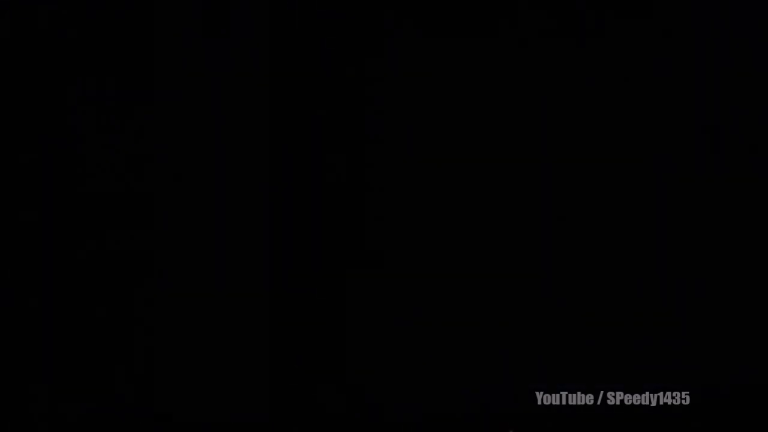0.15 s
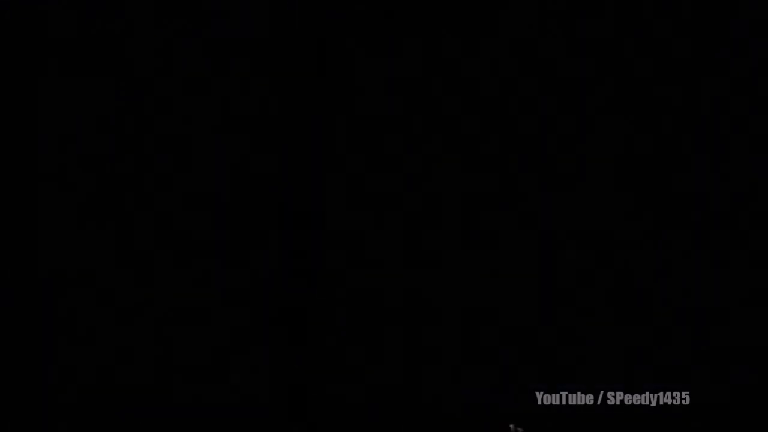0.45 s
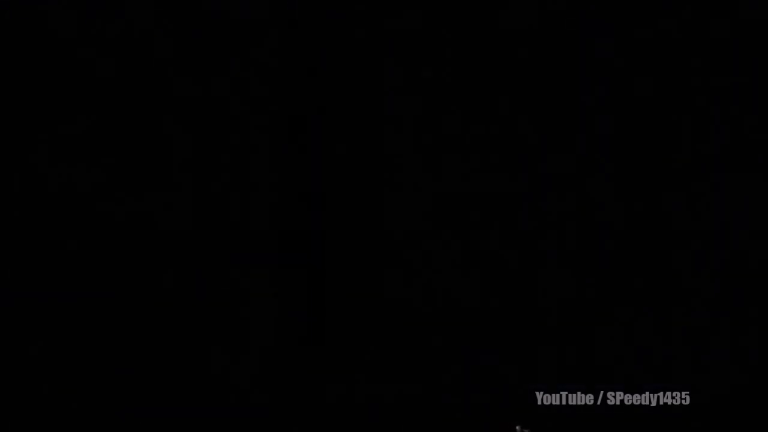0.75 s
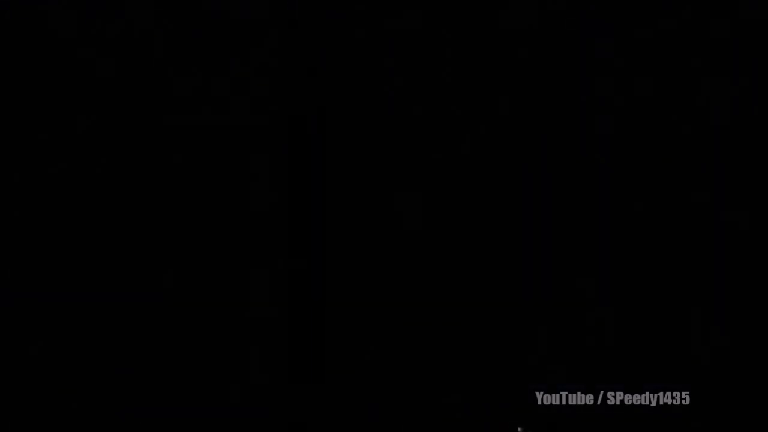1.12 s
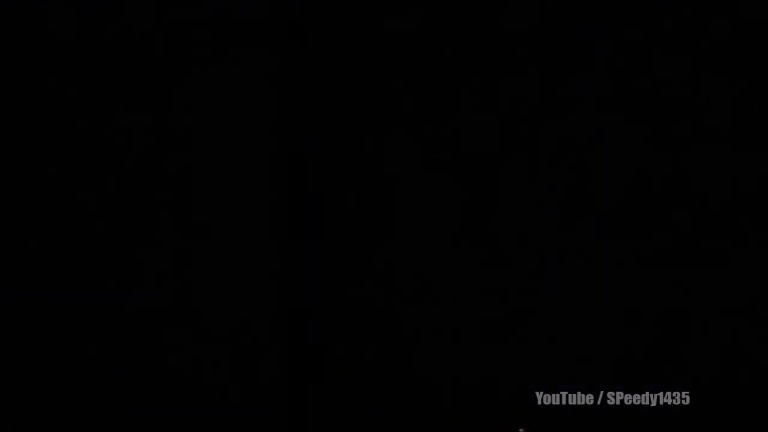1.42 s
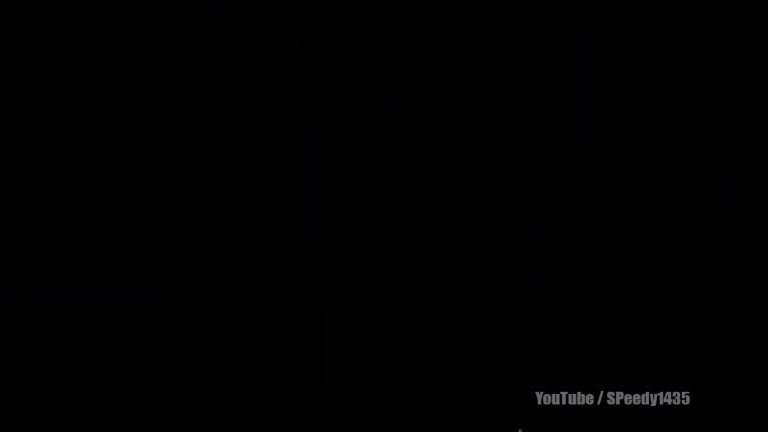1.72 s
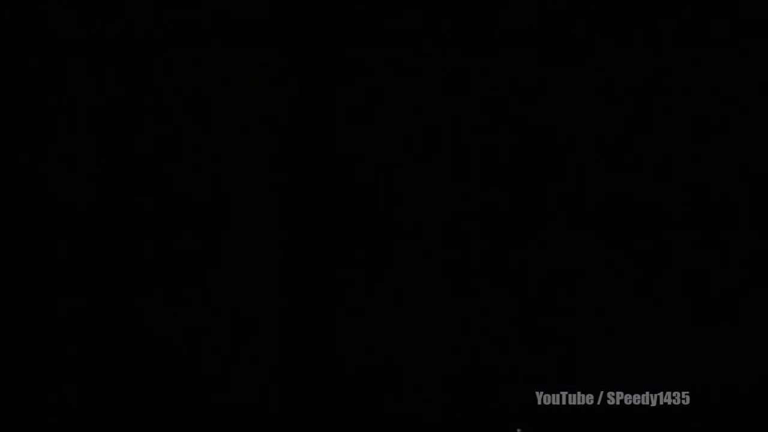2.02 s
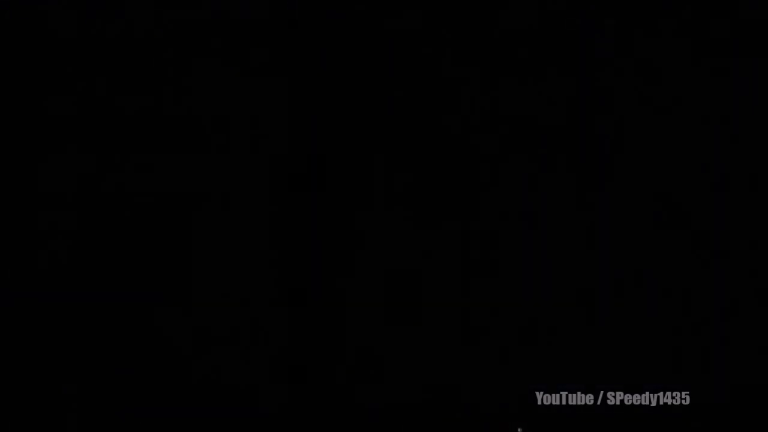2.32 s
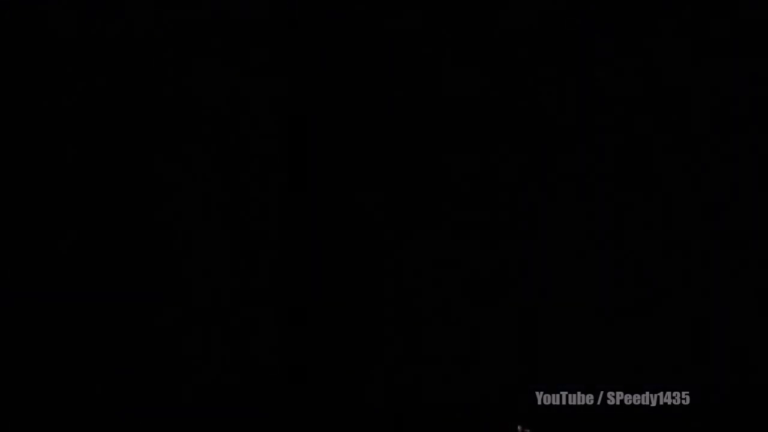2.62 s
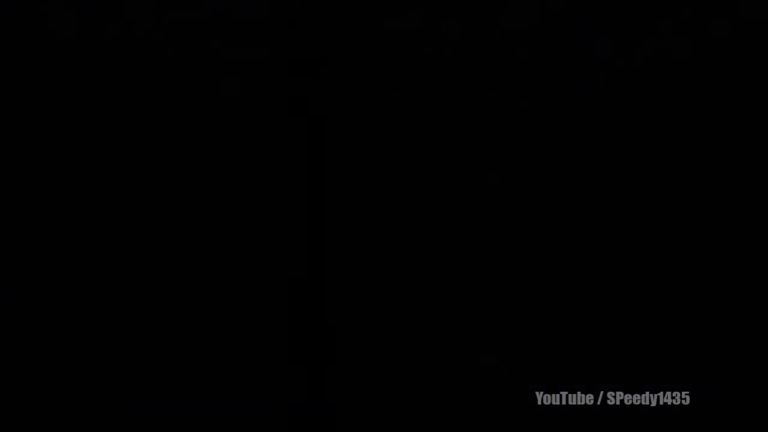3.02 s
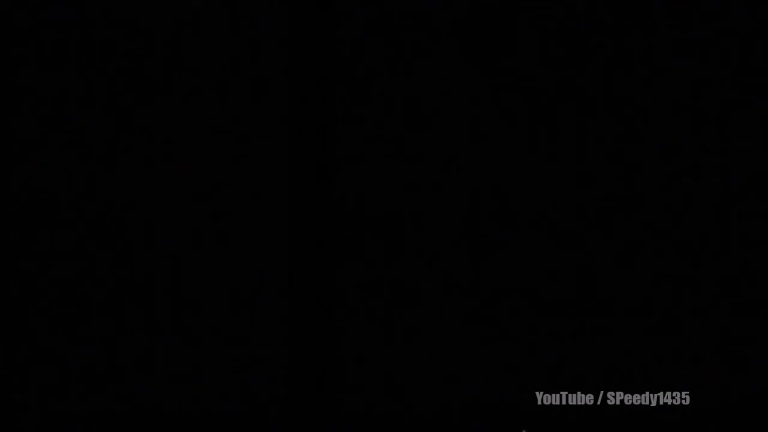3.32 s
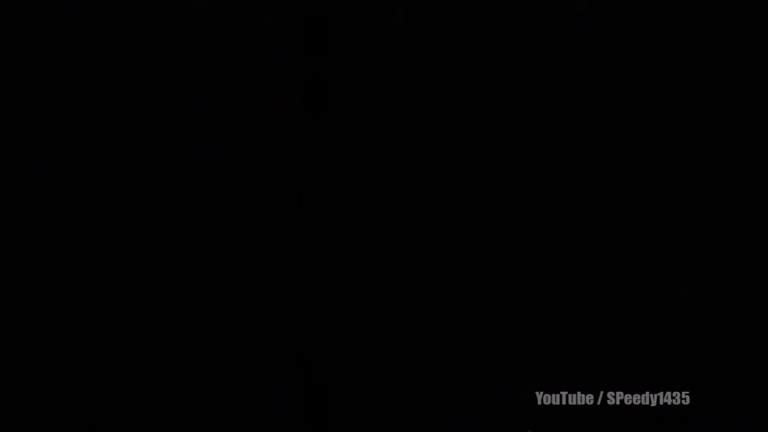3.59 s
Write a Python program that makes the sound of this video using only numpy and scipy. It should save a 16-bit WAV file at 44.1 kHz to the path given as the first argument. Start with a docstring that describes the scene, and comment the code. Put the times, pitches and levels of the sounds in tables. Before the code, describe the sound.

Distant thunder begins as a faint low rumble over soft, steady rain hiss, swells from 0.4 to 0.7 s, and rolls heavily in uneven booming surges until about 1.9 s. It weakens through 2.4 s, stirs again softly near 3.0 and 3.4 s, then fades. Dark, hollow resonance, no sharp crack. Very faint high electronic whine; treble blinks out briefly near 0.9, 1.4, 1.7, 1.8 and 3.7 s.

```python
"""Distant thunder rolls and booms over an evenly hissing far rain; thin tones whine, the treble briefly drops out.
Thunder: random pressure pulses from a long lightning channel, in four registers, ringing in the shelter.
Boom: two low sines, wavering in pitch and level. Rain: patchy noise with dense drops.
Whine: four sines at fixed pitch from the electronics. Dropouts: short dips of the upper spectrum."""
import sys
import numpy as np
from scipy import signal
from scipy.fft import rfft, irfft, next_fast_len
from scipy.io import wavfile
from scipy.ndimage import uniform_filter1d, map_coordinates

SR = 44100
rng = np.random.default_rng(int(sys.argv[2]) if len(sys.argv) > 2 else 0)


def makeup_ratio(level_db):
    """Linear amplitude ratio for a level in decibels (20 dB per factor of ten)."""
    decades = np.asarray(level_db, float) / 20
    return 10 ** decades


def dump(signal):
    """Clip the signal to [-1, 1] and save it as 16-bit WAV at the path in sys.argv[1]."""
    limited = np.clip(np.atleast_2d(signal).T, -1, 1)
    pcm = np.round(limited * 32767).astype(np.int16)
    wavfile.write(sys.argv[1], SR, pcm)


N = 165375


def unit(x):
    """Scales x to rms 1."""
    return x / np.sqrt(np.mean(x ** 2) + 1e-20)


def along(points, hz):
    """Gain from (f/Hz, level/dB) points, interpolated over log frequency."""
    f, level_db = np.transpose(points)
    return makeup_ratio(np.interp(np.log(hz + 1), np.log(f + 1), level_db))


def wobble(knots_per_s):
    """Smooth random curve: a spline through normal random knots."""
    knots = rng.standard_normal(400)
    return map_coordinates(knots, [np.arange(N) * knots_per_s / SR])


def filtered(x, response):
    """Filters x by a response of frequency, zero-padded."""
    m = next_fast_len(N + SR // 2)
    spectrum = rfft(x, m) * response(np.fft.rfftfreq(m, 1 / SR))
    return irfft(spectrum, m)[:N]


def impulses(per_s, spread_db):
    """Random arrivals of either sign; sizes in dB are exponentially distributed with mean spread_db."""
    u = rng.random((int(per_s * N / SR), 3))
    sample = (u[:, 0] * N).astype(int)
    sign = np.sign(u[:, 1] - .5)
    size = makeup_ratio(-spread_db * np.log(1 - u[:, 2]))
    return np.bincount(sample, sign * size, N)


def whine():
    """Thin tones of the electronics: sines at fixed pitch, slightly wavering in level."""
    # electronic tones: f/Hz, mean level/dB rms
    tones = [(7852, -78), (7882, -76), (11793, -79), (11823, -87)]
    t = np.arange(N) / SR
    total = 0
    for hz, db in tones:
        level = np.sqrt(2) * makeup_ratio(db + .7 * wobble(3))
        total = total + level * np.sin(2 * np.pi * hz * t)
    return total


def rain():
    """Far rain: noise, patchy over time and frequency, plus dense drops, in one spectral shape."""
    # spectral shape of the rain: f/Hz, relative level/dB
    rain_shape = [(150, 6), (700, -0.5), (1500, -1.3), (2600, -2.3), (4000, -8), (6000, -11), (8500, -16.5),
                  (11000, -21), (13000, -24.5), (15100, -31)]
    rain_db, patchy_db, drops_db = -46, 0.8, -8.5  # total rms; rms of the patches; drops over hiss
    drops_per_s = 3000
    z = signal.stft(rng.standard_normal(N + 512), nperseg=512)[2]
    patches = uniform_filter1d(rng.standard_normal(z.shape), 6, 0)
    patches = uniform_filter1d(patches, 10, 1)
    hiss = signal.istft(z * makeup_ratio(patchy_db * unit(patches)), nperseg=512)[1][:N]
    drops = unit(impulses(drops_per_s, 1.81))
    mix = unit(hiss) + makeup_ratio(drops_db) * drops
    return makeup_ratio(rain_db) * unit(filtered(mix, lambda hz: along(rain_shape, hz)))


def shelter(hz):
    """Response of the shelter: open air plus hollows that ring as second-order resonances."""
    # hollows: f/Hz, width/Hz, peak of each alone over open air/dB
    hollows = [(87, 7, 5), (103, 8, 3), (120, 8, 3), (172, 12, 6), (204, 10, 5), (235, 12, 2), (266, 14, 3),
               (337, 11, 6), (366, 12, 7), (424, 14, 4), (460, 12, 4), (508, 18, 3), (600, 22, 3),
               (778, 16, 3), (955, 60, 2)]
    total = 1
    for centre, width, db in hollows:
        damping = 1j * hz * width
        total = total + (makeup_ratio(db) - 1) * damping / (centre * centre - hz * hz + damping)
    return total


def boom():
    """The two lowest hollows boom almost as tones: sines wavering randomly in pitch and level."""
    # course of the boom: t/s, level of lower/dB rms, level of upper/dB rms
    boom_course = [(0.0, -43, -40), (0.11, -35, -49), (0.19, -56, -58), (0.36, -37, -42.5), (0.5, -50, -36),
                   (0.55, -49, -47), (0.7, -38, -33), (1.02, -39, -32), (1.14, -59, -41.5), (1.2, -39, -39),
                   (1.39, -38, -45), (1.73, -37, -27.5), (1.98, -29, -27.5), (2.06, -29, -40),
                   (2.15, -31, -36), (2.21, -54, -50), (2.27, -32, -33), (2.36, -28.5, -34.5),
                   (2.45, -40, -41), (2.84, -43, -45), (2.91, -37, -52), (2.98, -32, -40),
                   (3.31, -46.5, -52), (3.75, -40, -52)]
    # mean pitches of the two hollows: lower f/Hz, upper f/Hz
    boom_hz = (56, 68.25)
    waver_hz, waver_db = 2.5, 0.5
    s, *levels = np.transpose(boom_course)
    t = np.arange(N) / SR
    total = 0
    for hz, db in zip(boom_hz, levels):
        level = np.sqrt(2) * makeup_ratio(np.interp(t, s, db) + waver_db * wobble(18))
        phase = 2 * np.pi * np.cumsum(hz + waver_hz * wobble(7.4)) / SR
        total = total + level * np.sin(phase)
    return total


def thunder():
    """Pulses from near and far parts of the channel pile up in each register, which swells and fades on its own."""
    # the roll: t/s, deep level/dB, body level/dB, growl level/dB, upper edge level/dB
    roll = [(0.0, -56, -55, -46, -43), (0.02, -43.5, -42, -45.5, -52), (0.27, -37, -39, -44, -51.5),
            (0.41, -41, -31.5, -36, -42), (0.7, -26.5, -30.5, -30, -41.5), (0.76, -40, -23, -29.5, -41.5),
            (0.92, -28.5, -27, -28, -39), (1.19, -30, -20.5, -28, -37.5), (1.23, -31, -29.5, -32, -41.5),
            (1.37, -26.5, -26.5, -28.5, -40.5), (1.61, -35, -20, -29, -38), (1.65, -38, -25, -30, -42.5),
            (1.76, -24.5, -23.5, -28.5, -39.5), (2.05, -37, -31.5, -33.5, -44.5),
            (2.1, -33.5, -29, -33, -42.5), (2.21, -41.5, -33.5, -37.5, -46.5), (2.27, -31.5, -30, -36, -45),
            (2.63, -42.5, -36.5, -45.5, -53), (2.74, -41, -39, -41.5, -49.5), (2.98, -37, -31.5, -39, -45),
            (3.18, -43, -42, -44.5, -52), (3.4, -36.5, -34, -42.5, -50.5), (3.68, -42.5, -41, -46.5, -57),
            (3.75, -47, -44, -43.5, -61)]
    # spectral shapes of the four registers, each: f/Hz, relative level/dB
    deep = [(10, -20), (25, 1), (45, 0), (52, -14), (72, -7), (82, 12), (125, 5.5), (160, -49), (300, -120)]
    body = [(50, -120), (105, -38), (135, 0.5), (170, 3), (270, 0.5), (300, -3), (360, -31), (700, -120)]
    growl = [(120, -120), (240, -51), (295, -4.5), (350, 3.5), (480, 0.5), (620, -5.5), (760, -21),
             (1500, -120)]
    edge = [(250, -120), (500, -7), (625, 1), (800, -5.5), (1000, -10.5), (1250, -20.5), (1700, -40),
            (3500, -120)]
    pulses_per_s, size_spread_db = 2500, 1.92  # per register
    clump_db, clump_knots_per_s = 0.2, 12
    shared = .4  # weight of the surge common to all registers
    s, *levels = np.transpose(roll)
    t = np.arange(N) / SR
    surge, total = wobble(clump_knots_per_s), 0
    for band, db in zip((deep, body, growl, edge), levels):
        clumps_db = clump_db * (shared * surge + wobble(clump_knots_per_s))
        pulses = impulses(pulses_per_s, size_spread_db) * makeup_ratio(clumps_db)
        path = lambda hz: along(band, hz) * shelter(hz)
        swell = makeup_ratio(np.interp(t, s, db))
        # scaled by the rms of the register without its swell
        total = total + filtered(pulses * swell, path) / np.std(filtered(pulses, path))
    return total


def scene():
    """Thunder and boom over rain and whine, one channel."""
    return (thunder() + boom() + rain() + whine())[None]


def treble_gaps(x):
    """The treble drops out briefly: Gaussian dips in dB on a short-time spectrum, returning faster than falling."""
    # dropouts: centre t/s, twice the fall time constant at the lower edge/s, depth/dB, lower edge f/Hz
    gaps = [(.1655, .016, 15, 3500), (.892, .012, 35, 3200), (1.384, .015, 28, 3000),
            (1.728, .016, 45, 3200), (1.8305, .011, 28, 3200), (2.918, .019, 15, 3800),
            (3.687, .014, 28, 3700)]
    widens = .8  # relative lengthening at SR / 2 above the lower edge
    return_over_fall = .4  # time ratio
    hz, t, z = signal.stft(x, SR, nperseg=128, noverlap=112)
    for mid, length, depth_db, above_hz in gaps:
        above = np.clip(hz - above_hz, 0, None) / (SR / 2)
        fall_s = length / 2 * (1 + widens * above)[:, None]
        side_s = fall_s * np.where(t > mid, return_over_fall, 1)
        dip = np.exp(-((t - mid) / side_s) ** 2)
        treble = np.clip((hz - above_hz) / 400 + .5, 0, 1)[:, None]  # 400 Hz wide transition
        z = z * makeup_ratio(-depth_db * dip * treble)
    return signal.istft(z, SR, nperseg=128, noverlap=112)[1][None, :N]


def low_pass(x):
    """Removes everything above the highest recorded frequency."""
    return signal.sosfilt(signal.butter(12, 15170, fs=SR, output="sos"), x)


def record(dry):
    """The finished mix: the scene with its brief treble dropouts."""
    mix = treble_gaps(dry[0])
    return low_pass(mix)


dry = scene()
out = record(dry)
dump(out)
```